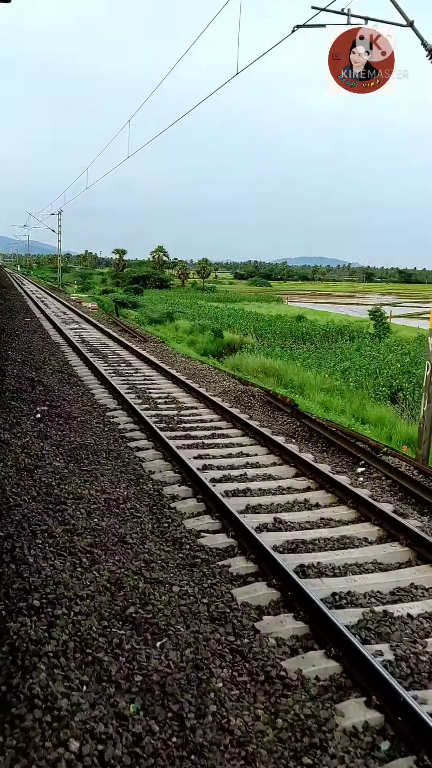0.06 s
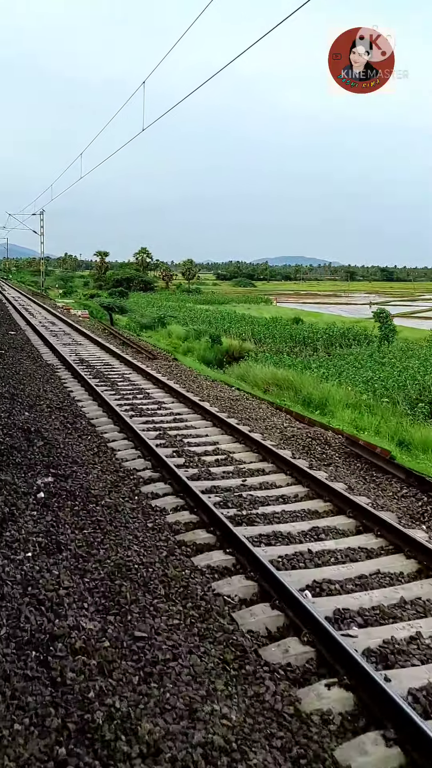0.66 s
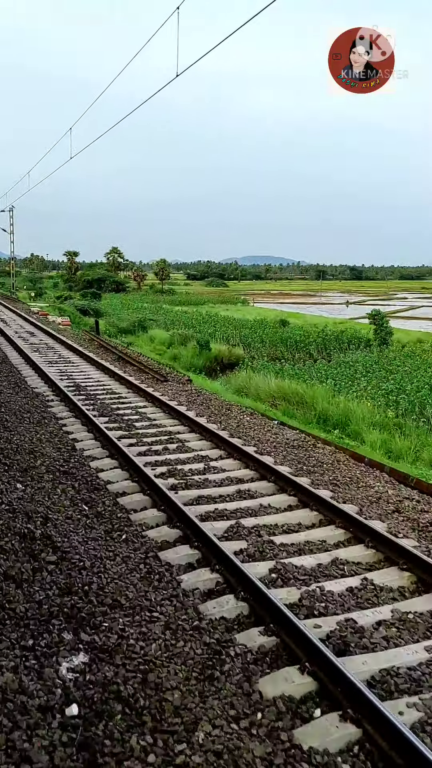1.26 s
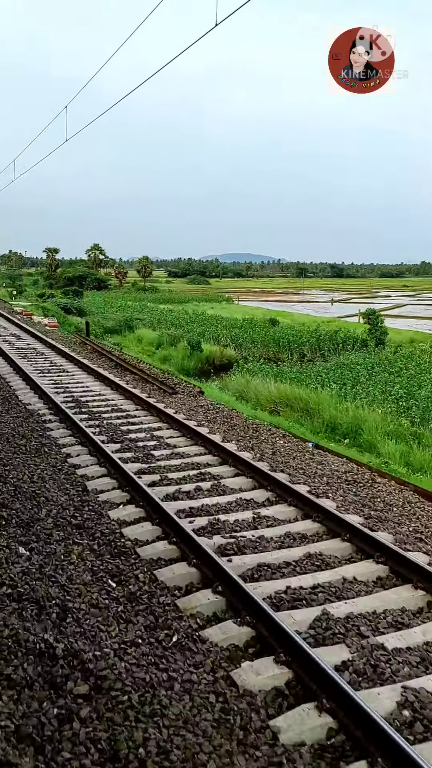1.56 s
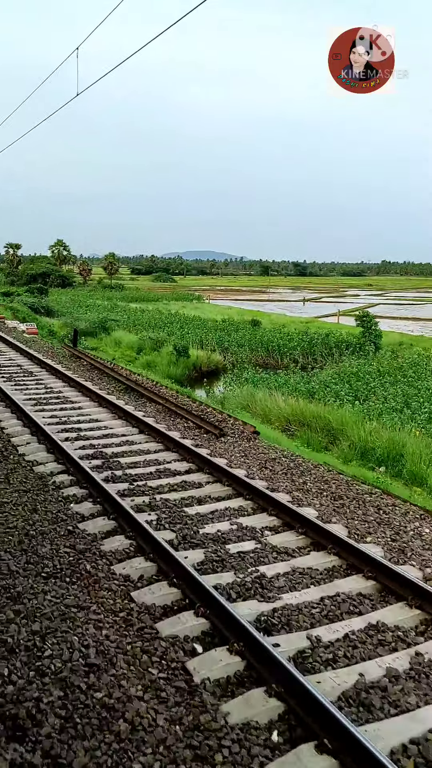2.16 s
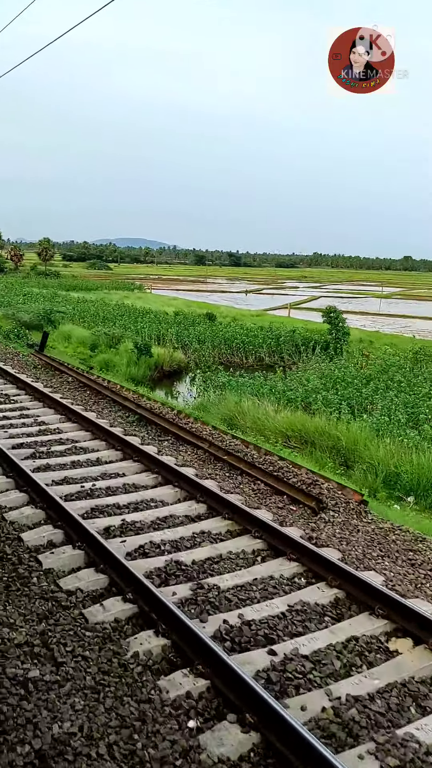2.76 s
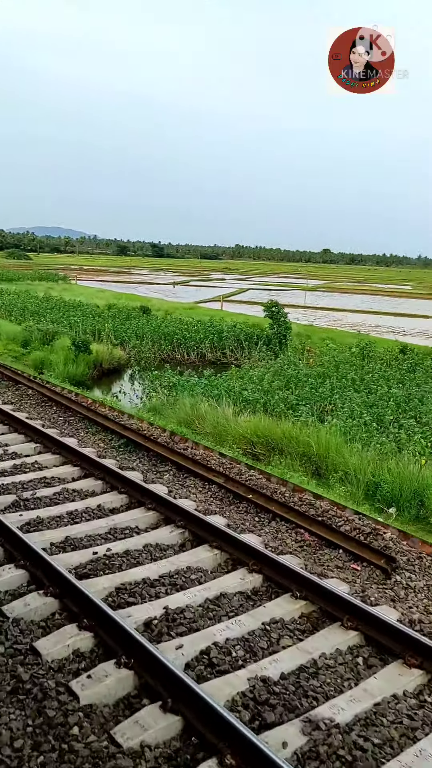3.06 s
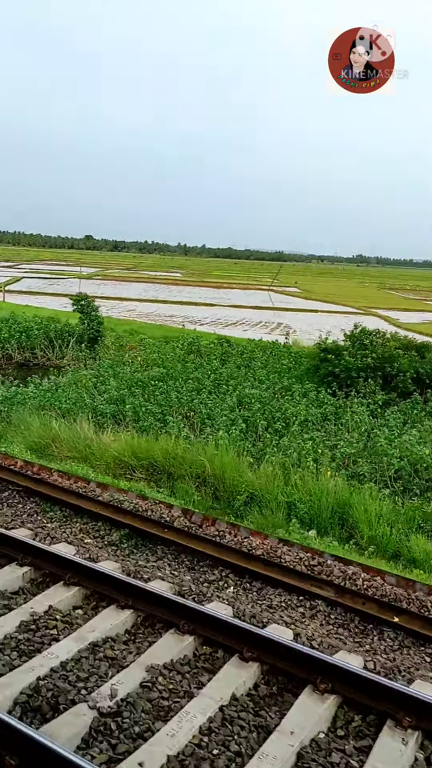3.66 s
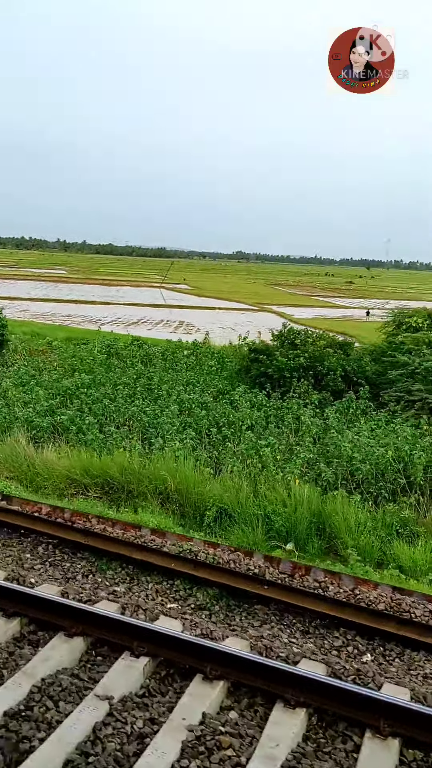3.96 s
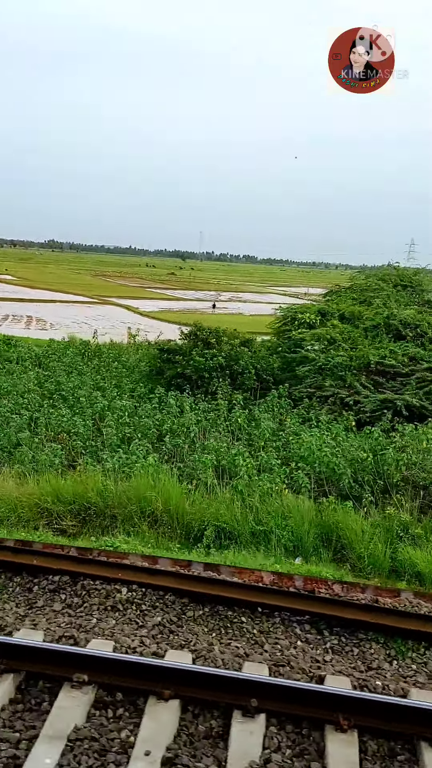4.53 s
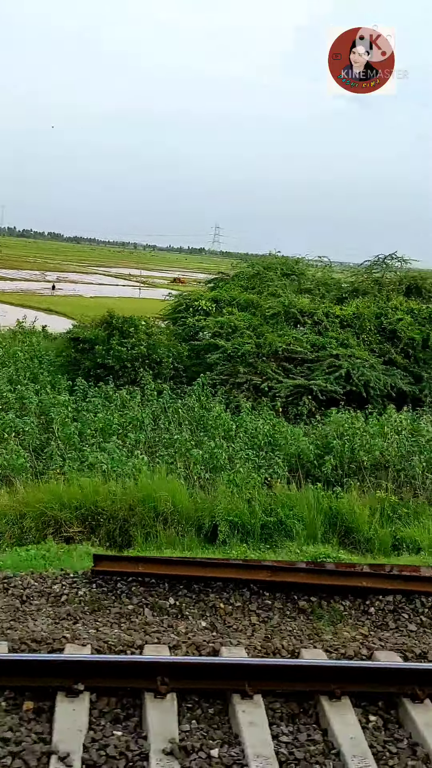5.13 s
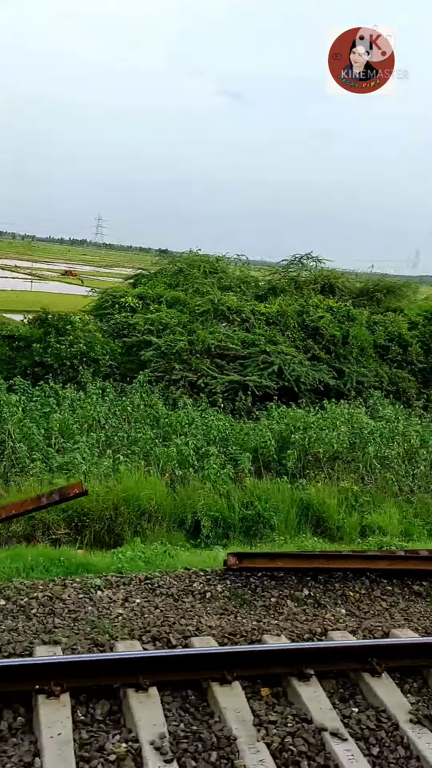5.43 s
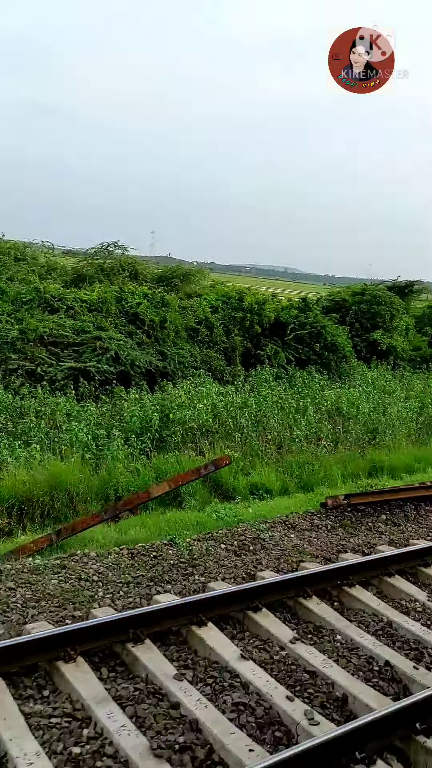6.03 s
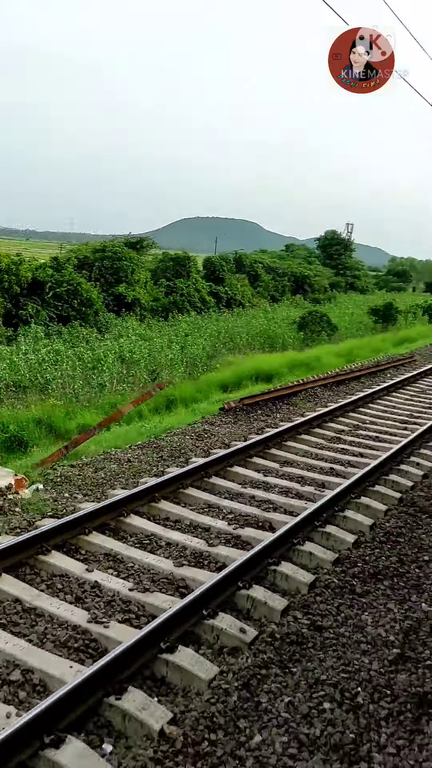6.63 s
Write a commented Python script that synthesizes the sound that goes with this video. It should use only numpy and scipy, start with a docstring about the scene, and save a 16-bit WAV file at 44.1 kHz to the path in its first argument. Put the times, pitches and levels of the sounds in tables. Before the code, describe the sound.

A passenger train runs at speed, heard from an open coach door. A steady low rumble and high wheel hiss continue throughout. The wheels strike rail joints with irregular, often paired thuds and ringing steel clanks, light at first and then harder. Loose fittings tick faintly, a few short gusts buffet the microphone, and a thin whistle and faint squeal rise from the wheels in the second half.

```python
"""A passenger coach at speed, heard from its open door: the body rumbles, wheels hiss and sing on the rail.
From the start loose fittings tick and axles strike rail joints, mostly in pairs, thudding through the
floor and ringing the steel. Just after 1 s the first slipstream gust buffets the two microphone ports;
from 1.5 s the blows land harder, and between 2 and 4 s a flange scrapes three times. One wheel mode
whistles from about 3.5 s, a faint squeal crests near 5.4 s, and a last gust passes at 6.6 s."""
import sys
import numpy as np
from scipy import signal
from scipy.fft import rfft, irfft, next_fast_len
from scipy.io import wavfile
from scipy.ndimage import map_coordinates

SR = 44100
rng = np.random.default_rng(int(sys.argv[2]) if len(sys.argv) > 2 else 0)


def dump_mix(stems):
    """Bounce the given channels to the path in sys.argv[1] as a 16-bit WAV at rate SR."""
    frames = np.atleast_2d(stems).T  # one column per channel
    limited = np.clip(frames, -1, 1)  # hard clip at full scale
    pcm = np.round(limited * 32767).astype(np.int16)
    wavfile.write(sys.argv[1], SR, pcm)


N = 299439

# spectrum of the first bite of steel on steel: f/Hz, level/dB
CRACK = [(500, 14), (1000, 3.5), (1800, 9.5), (2700, -3), (3400, -10.5), (4500, -8.5), (8000, 1.5),
         (15000, -18)]
# spectrum of the bright splash of high steel modes: f/Hz, level/dB
SPLASH = [(4500, -32), (6000, 13.5), (7000, 10.5), (8600, 18.5), (9500, 1), (11300, -26), (15000, -80)]


def joints():
    """Wheels hit rail joints: the floor thuds, the bogie knocks, steel clashes, wheel and rail ring."""
    # wheel blows, mostly a bogie's two axles 0.36 s apart: t/s, thud/dB, knock/dB, crack/dB, clash/dB,
    # ring/dB, chatter length/s, knock/Hz, ring/Hz, left over right for thud and knock/dB
    blows = [(0.222, -25.5, -41, -41, -45, -45, 0.019, 810, 6440, 0),
             (0.483, -27, -38, -40, -41.5, -64, 0.039, 1020, 6450, 4),
             (0.576, -28, -32, -48, -31, -38, 0.043, 593, 6700, 8.5),
             (0.946, -22, -24, -52, -30.5, -35, 0.047, 632, 6620, 0),
             (1.542, -12.5, -23.5, -30, -22, -18.5, 0.024, 440, 6610, 4),
             (1.909, -15, -28.5, -55, -26.5, -58, 0.041, 770, 6500, 0),
             (2.247, -22.5, -31, -37, -50, -38, 0.023, 636, 6430, -2),
             (2.608, -15.5, -27, -35, -41, -39, 0.029, 702, 6500, -1.5),
             (3.186, -9, -33, -30, -32, -36, 0.033, 420, 6370, -1.5),
             (3.198, -19, -32, -39, -43, -46, 0.027, 700, 6200, -1),
             (3.434, -22.5, -33, -51, -57, -59, 0.02, 444, 6400, -9),
             (3.559, -13, -37, -39, -37, -34, 0.013, 860, 6280, 0),
             (3.598, -19.5, -37, -52, -54, -50, 0.02, 550, 6430, -2),
             (3.898, -22, -21, -40, -45.5, -48, 0.03, 764, 6440, -1.5),
             (4.132, -25, -27.5, -50, -48, -55, 0.02, 576, 6400, -8),
             (4.247, -13, -16.5, -35, -39, -26.5, 0.049, 537, 6400, -0.5),
             (4.818, -10, -20, -26, -36, -17, 0.025, 436, 6370, 0),
             (5.181, -9, -17.5, -31, -37, -27, 0.049, 726, 6330, -1.5),
             (5.507, -14, -21, -36.5, -53, -43, 0.02, 480, 6300, 0.5),
             (5.856, -15, -15, -35.5, -40.5, -35, 0.034, 415, 6250, 0),
             (6.418, -8.5, -17.5, -24, -36, -29.5, 0.031, 399, 6480, 0.5),
             (6.465, -25, -33, -41, -39.5, -33.5, 0.015, 623, 6500, -4),
             (6.667, -41, -25.5, -40, -52, -41, 0.02, 620, 6240, -2),
             (6.772, -11, -19, -30.5, -31.5, -43, 0.025, 600, 6470, -1)]
    # spectra of the dull knock, the broad clash and the rail's ping: f/Hz, level/dB
    knock_tone = [(200, -10), (350, -0.5), (470, 4.5), (750, 0), (1100, -9.5), (1600, -18.5), (3000, -64)]
    clash_tone = [(600, 8), (1100, 7.5), (1500, 0.5), (2000, 5), (2750, -1.5), (3300, -5.5), (4500, -11),
                  (7000, -25), (11000, -21), (15000, -25)]
    ping_tone = [(2500, -13), (3500, 4), (4400, 1.5), (5400, 3.5), (6200, 15), (8000, -37), (15000, -36)]
    # high modes of the steel, and modes of the struck rail end: f/Hz, width/Hz, level/dB
    steel_modes = [(5170, 130, 2), (5800, 110, 7), (6370, 140, 20), (7260, 110, 6), (7600, 150, 12),
                   (8520, 150, 14.5), (9640, 110, -2), (10820, 170, 1), (12720, 150, -5), (14170, 130, -9)]
    rail_modes = [(1930, 60, -2), (2250, 45, -4), (2760, 45, 0), (3060, 40, -1), (4270, 40, 1),
                  (4640, 45, 3), (5330, 45, 0), (5870, 50, 1)]
    steel_hz = 6370  # the strongest steel mode, retuned to each blow's ring pitch
    lead_in_s = 0.0088  # a faint rasp swells this long before each crack
    low, grit, rings = np.zeros((3, 2, N))
    steel = peaks(steel_modes)
    for s, thud_db, knock_db, crack_db, clash_db, ring_db, chatter_s, knock_hz, ring_hz, pan_db in blows:
        knock = amp(-5) * burst(colour(knock_tone), rise=0.0015, hold=0.013, t60=0.1)
        knock += amp(-3) * hollow_bogie(knock_hz)
        underframe = amp(-13.5) * burst(colour(knock_tone), rise=0.025, hold=0.049, t60=0.12)
        bright_db = 7.5 + 0.6 * (knock_db - thud_db)  # a harder knock brightens the thud
        body = floor_thud(thud_db, bright_db) + amp(knock_db) * (knock + underframe)
        add(low, s, amp(np.array([[.5], [-.5]]) * pan_db) * body)
        clash = burst(metallic(clash_tone, depth_db=8.5, count=220), rise=0.0053, hold=chatter_s, t60=0.26)
        ping = burst(metallic(ping_tone, depth_db=14, count=150), rise=0.0092, hold=chatter_s, t60=0.26)
        splash = burst(metallic(SPLASH, depth_db=15, count=130), rise=0.0058, hold=0.017, t60=0.42)
        crack = burst(metallic(CRACK, depth_db=9, count=60), rise=0.0035, hold=0.008, t60=0.06)
        lead_in = burst(metallic(CRACK, depth_db=9, count=60), rise=0.008, hold=lead_in_s, t60=0.06)
        add(grit, s - lead_in_s, amp(crack_db - 6) * lead_in)
        add(grit, s, amp(crack_db) * crack + amp(clash_db) * clash)
        ring = burst(lambda hz: steel(hz * steel_hz / ring_hz), rise=0.0057, hold=chatter_s, t60=0.18)
        rail_gain = amp(-4.5) * np.hypot(amp(clash_db), amp(crack_db - 6))
        rail = rail_gain * burst(peaks(rail_modes), rise=0.003, hold=chatter_s, t60=0.27)
        sparkle = amp(-6) * ping + amp(-2) * splash
        add(rings, s, amp(clash_db) * sparkle + rail + amp(ring_db) * ring)
    chatter = unit(amp(3 * wobble(300)))  # the steel rattles during a blow
    return low + chatter * grit + rings


def floor_thud(thud_db, bright_db, rebound_s=0.00799, rebound_db=-2, spread_s=0.00425, hits=3):
    """A blow and its rebounds ring the floor; as bending waves, the higher modes arrive first."""
    # modes of the coach floor: f/Hz, level/dB, t60/s
    floor_modes = [(105.1, -3.5, 0.19), (119, -4.5, 0.1), (167, 1.5, 0.11), (217.6, 2, 0.086),
                   (287, -8, 0.13), (340, -3.5, 0.088), (407, -4.5, 0.12)]
    t = np.arange(SR // 3) / SR
    starts = np.arange(hits) * rebound_s * (1 + 0.19 * rng.uniform(-1.4, 1, hits))
    out = np.zeros((2, len(t)))
    for hz, db, t60 in floor_modes:
        travel_s = spread_s * np.sqrt(floor_modes[0][0] / hz)
        age = np.maximum(t - starts[:, None] - travel_s, 0)
        sizes = rng.choice([-1, 1], hits) * amp(np.arange(hits) * rebound_db)
        detuned_hz = hz * (1 + 0.049 * rng.normal())
        mode = sizes @ (amp(-60 * age / t60) * np.sin(2 * np.pi * detuned_hz * age))
        lift_db = np.interp(hz, [160, 250], [0, bright_db])
        port_scatter_db = 2 * rng.standard_normal((2, 1))
        out += amp(db + lift_db + port_scatter_db) * unit(mode)
    low_cut = signal.butter(2, 75, 'highpass', fs=SR, output='sos')  # the floor radiates little deep bass
    return amp(thud_db - 10.5) * unit(signal.sosfilt(low_cut, out))


def hollow_bogie(knock_hz, rebound_s=0.0105, rebound_db=-1, rise=0.0011):
    """A blow and one rebound ring the bogie's hollow modes; rms 1 over the first 40 ms."""
    # modes of the bogie: multiple of the knock pitch, level/dB, t60/s
    bogie_modes = [(0.999, 5, 0.055), (1.17, -3.5, 0.046), (1.63, -13, 0.043), (2.3, -23, 0.05)]
    t = np.arange(SR // 3) / SR
    rebound_at = rebound_s * (1 + 0.21 * rng.uniform(-1.07, 1))
    age = np.maximum(t - np.array([[0], [rebound_at]]), 0)
    modes = sum(amp(db - 60 * age / t60) * np.sin(2 * np.pi * (knock_hz * ratio * age + rng.random()))
                for ratio, db, t60 in bogie_modes)
    sound = amp([0, rebound_db]) @ (modes * (1 - np.exp(-age / rise)))
    return sound / np.sqrt(np.mean(sound[:SR // 25] ** 2))


def rolling():
    """Rail roughness sways and shakes the coach, roars under the floor and hisses at the wheels."""
    # how hard the track shakes the coach: t/s, level/dB
    shake = [(0.0, -27), (0.43, -30), (1.11, -26), (1.44, -28), (2.63, -26), (3.04, -28), (3.35, -26.5),
             (3.8, -27.5), (4.78, -27), (5.11, -28.5), (5.33, -26.5), (5.84, -28.5), (6.79, -25)]
    # spectra of the bed, from deep sway up to wheel hiss: f/Hz, level/dB
    sway_tone = [(12, -13), (25, -1.5), (50, 1), (70, -2.5), (110, -14), (300, -75)]
    rumble_tone = [(20, -33), (55, -15), (80, -5.5), (120, -5.5), (180, 2), (250, -0.5), (310, 3),
                   (360, -6.5), (410, -6), (520, -13), (800, -29.5), (1500, -73)]
    roar_tone = [(250, 0.5), (500, -1.5), (750, 3.5), (1050, 2), (1450, -4.5), (1900, -5), (2300, -13),
                 (2700, -11), (3100, -38), (3700, -33), (4200, -19), (5000, -18.5), (6000, -8.5),
                 (15000, -55)]
    hiss_tone = [(4000, -13), (6000, -48), (6900, -8.5), (7500, 1.5), (8600, 4.5), (9300, 2), (10200, -6),
                 (12000, -9.5), (15300, -18)]
    t = np.arange(N) / SR
    shake_db = curve(shake)
    swing_db = shake_db - shake_db.mean()
    rough_db = wobble(14)
    sway = amp(-34.5 + 2.3 * swing_db + 2.4 * wobble(6)) * rush(colour(sway_tone))
    rumble = amp(3 + shake_db + rough_db + 1.4 * wobble(35)) * rush(colour(rumble_tone))
    # each wheel of an axle wavers on its own and has its own fine modes
    roar = sum(amp(2.2 * wobble(20)) * rush(metallic(roar_tone, depth_db=9, count=600))
               for wheel in ("near", "far"))
    hiss = sum(amp(1.1 * wobble(16)) * rush(metallic(hiss_tone, depth_db=5.5, count=650))
               for wheel in ("near", "far"))
    roar_db = -37 + 0.46 * swing_db + 0.8 * rough_db
    hiss_db = -34.5 - 0.12 * t
    return sway + rumble + amp(roar_db) * unit(roar) + amp(hiss_db) * unit(hiss)


def slipstream(eddy_db=2.5, eddy_rate=27):
    """Gusts full of eddies buffet one port more than the other."""
    # gusts: t/s, length/s, level/dB, left over right/dB
    gusts = [(1.185, 0.18, -27, -9), (1.364, 0.026, -21.5, -2), (3.565, 0.15, -27.5, -6),
             (4.103, 0.088, -23.5, -4), (6.597, 0.091, -24, 9)]
    # spectrum of air buffeting a port: f/Hz, level/dB
    buffet_tone = [(20, -2), (60, 2.5), (140, 4.5), (300, 7.5), (550, -4), (900, -23), (2000, -44),
                   (5000, -80)]
    gain = sum(amp(db + np.array([[.5], [-.5]]) * pan_db) * swell(s, length)
               for s, length, db, pan_db in gusts)
    eddies = unit(filtered(rng.standard_normal((2, N)), colour(buffet_tone)))
    return amp(3 + eddy_db * wobble(eddy_rate)) * gain * eddies


def scrapes():
    """The flange brushes the rail head and stirs the high modes."""
    # flange touches: t/s, length/s, level/dB
    touches = [(2.083, 0.077, -34), (2.443, 0.029, -32.5), (3.916, 0.11, -37.5)]
    gain = sum(amp(db) * swell(s, length) for s, length, db in touches)
    return gain * rush(metallic(SPLASH, depth_db=8, count=140))


def rattles():
    """Loose fittings under the coach tick between the joints."""
    # ticks: t/s, level/dB
    ticks = [(0.100, -45), (0.743, -46), (0.863, -45.5), (2.082, -38), (2.512, -40), (2.882, -53),
             (3.000, -46), (3.495, -36), (4.022, -37), (4.424, -44), (4.606, -43), (4.719, -46)]
    out = np.zeros((2, N))
    for s, db in ticks:
        tick = burst(metallic(CRACK, depth_db=11, count=70), rise=0.001, hold=0.0049, t60=0.17)
        add(out, s, amp(db) * tick)
    return out


def wheel_song(crest_s=5.44, swell_s=2.5):
    """Rolling keeps lightly damped wheel modes singing; one group swells slowly into a faint squeal."""
    # wheel modes that sing throughout, and those that swell: f/Hz, level/dB
    song_modes = [(2250, -11), (2790, -13), (7401, -6.5)]
    squeal_modes = [(4627, -15), (5450, -9.5), (5652, -7), (5852, -7), (5949, -9), (6354, 3), (6449, 3.5),
                    (6530, -7)]
    t = np.arange(N) / SR
    song = amp(-51.5) * singing(song_modes, width_hz=21, waver_db=2.5, waver_rate=1.7)
    squeal_db = -45 + 3.5 * np.exp(-((t - crest_s) / swell_s) ** 2)
    return song + amp(squeal_db) * singing(squeal_modes, width_hz=26, waver_db=2, waver_rate=9)


def whistle(pitch_hz=4300):
    """One wheel mode sings on its own, rough and fitful."""
    # the whistle's rise and fall: t/s, level/dB
    fader = [(0.0, -70), (3.1, -66), (3.55, -55), (4.3, -53), (4.8, -51.5), (5.2, -53.5), (5.5, -62),
             (6.79, -62)]
    return amp(curve(fader)) * singing([(pitch_hz, 0)], width_hz=34, waver_db=3.2, waver_rate=18)


def singing(modes, width_hz, waver_db, waver_rate):
    """Narrow noise bands at (f/Hz, level/dB) modes, each swelling and fading on its own; rms 1."""
    return unit(sum(amp(db + waver_db * wobble(waver_rate)) * rush(peaks([(hz, width_hz, 0)]))
                    for hz, db in modes))


def burst(response, rise, hold, t60):
    """Resonant noise swells, is fed for hold seconds, then dies away; rms 1 over the first 40 ms."""
    t = np.arange(SR // 3) / SR
    shape = (1 - np.exp(-t / rise)) * amp(-60 * np.maximum(t - hold, 0) / t60)
    sound = shape * rush(response, size=len(t))
    return sound / np.sqrt(np.mean(sound[:, :SR // 25] ** 2))


def rush(response, size=N):
    """Stereo noise of rms 1, alike in the bass and diffuse in the treble."""
    # likeness of left and right: f/Hz, correlation
    likeness = [(30, 0.54), (70, 0.55), (160, 0.72), (350, 0.9), (700, 0.39), (1500, 0.17), (5000, 0.062),
                (8000, 0.19), (14000, 0.18)]

    def mid_side(hz):
        width = np.arccos(along(likeness, hz)) / 2
        return response(hz) * np.array([np.cos(width), np.sin(width)])

    mid, side = filtered(rng.standard_normal((2, size)), mid_side)
    return unit(np.array([mid + side, mid - side]))


def metallic(points, depth_db, count):
    """A spectrum broken into peaks and gaps by close steel modes, count knots over the whole band."""
    knots = rng.standard_normal(count)
    ripple = lambda hz: np.tanh(map_coordinates(knots, [hz * 2 * count / SR]))
    return lambda hz: amp(along(points, hz) + depth_db * np.clip(hz / 2500, 0, 1) * ripple(hz))


def peaks(modes):
    """The gain of (f/Hz, width/Hz, level/dB) modes with dark valleys between them."""
    return lambda hz: sum(amp(db) * (hz * width) ** 2 / ((centre ** 2 - hz ** 2) ** 2 + (hz * width) ** 2)
                          for centre, width, db in modes)


def colour(points):
    """The response of an (f/Hz, level/dB) spectrum."""
    return lambda hz: amp(along(points, hz))


def filtered(x, response):
    """x shaped by a complex response of frequency."""
    n = x.shape[-1]
    padded = next_fast_len(n + SR // 4)
    return irfft(rfft(x, padded) * response(np.fft.rfftfreq(padded, 1 / SR)), padded)[..., :n]


def along(points, hz):
    """Interpolate (f/Hz, value) points on a log axis."""
    f, values = np.transpose(points)
    return np.interp(np.log(hz + 1), np.log(f + 1), values)


def curve(points):
    """One value per sample from (t/s, value) points."""
    return np.interp(np.arange(N) / SR, *np.transpose(points))


def swell(s, length):
    """A bell-shaped fade in and out, cresting at time s."""
    return np.exp(-2 * ((np.arange(N) / SR - s) / length) ** 2)


def wobble(rate):
    """A smooth random curve, rate knots a second."""
    return map_coordinates(rng.standard_normal(int(N * rate / SR) + 4), [np.arange(N) * rate / SR])


def add(out, s, sound):
    """Mix a sound in at time s."""
    part = out[..., round(s * SR):][..., :sound.shape[-1]]
    part += sound[..., :part.shape[-1]]


def amp(db):
    """Decibels to gain."""
    return 10 ** (np.asarray(db) / 20)


def unit(x):
    """Scale to rms 1."""
    return x / np.sqrt(np.mean(x ** 2) + 1e-20)


def scene():
    """The running gear lies to the left, so it reaches that port first; gusts hit the ports directly."""
    # head start of the left port: f/Hz, lead/s
    left_lead = [(100, 0.0001), (300, 0.000064), (700, 0.00039), (5000, 0.000444)]
    lead = lambda hz: np.exp(1j * np.pi * hz * along(left_lead, hz) * np.array([[1], [-1]]))
    running_gear = rolling() + wheel_song() + whistle() + joints() + rattles() + scrapes()
    return filtered(running_gear, lead) + slipstream()


def record(dry):
    """Each port has its own treble resonance; the hardest peaks are rounded and the very top is cut."""
    # colour of each microphone port: f/Hz, level/dB
    left_port = [(150, -2), (400, -2), (1500, -1), (4000, 2), (6400, -8.5), (6950, -4), (7600, -4),
                 (8600, 1.5), (9400, -3), (11000, -6.5)]
    right_port = [(150, -3), (400, -4), (1500, -4), (4000, 2), (6400, -6.5), (7000, 6.5), (7500, 4),
                  (8600, -9.5), (9600, -11.5), (11000, -10.5)]
    ceiling, top_hz = 0.93, 15450
    coloured = filtered(dry, lambda hz: amp([along(left_port, hz), along(right_port, hz)]))
    rounded = coloured / (1 + (coloured / ceiling) ** 6) ** (1 / 6)
    return filtered(rounded, lambda hz: hz < top_hz)


dry = scene()
out = record(dry)
dump_mix(out)
```